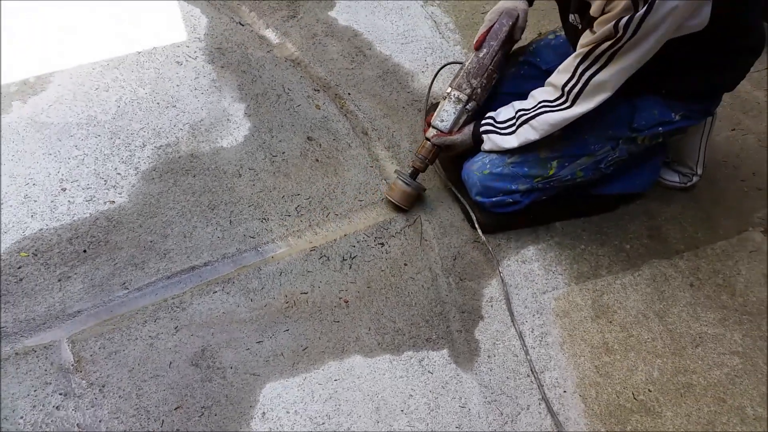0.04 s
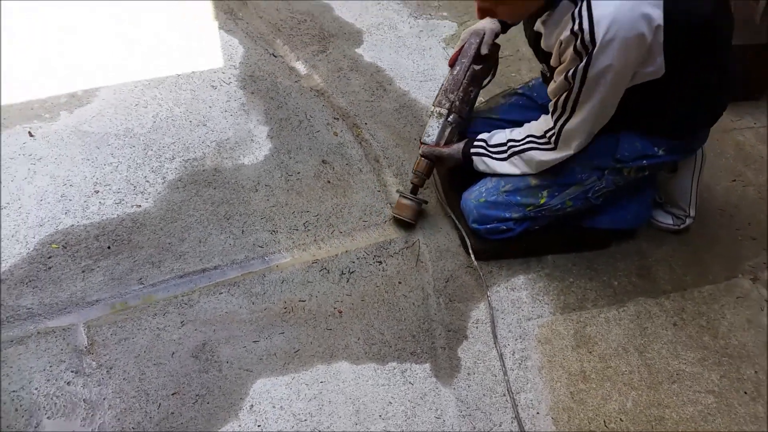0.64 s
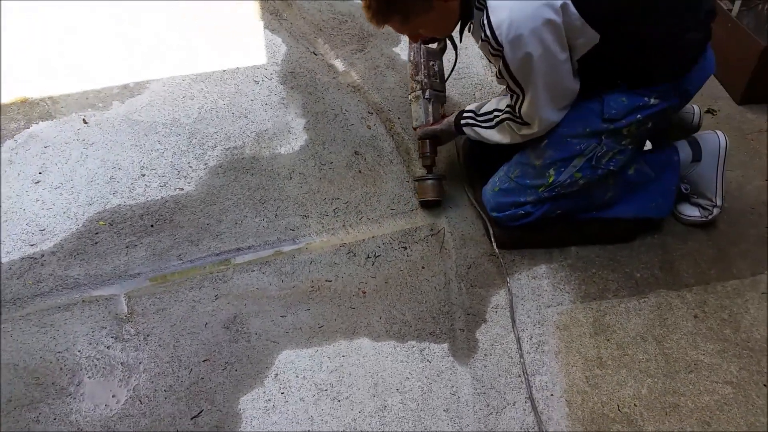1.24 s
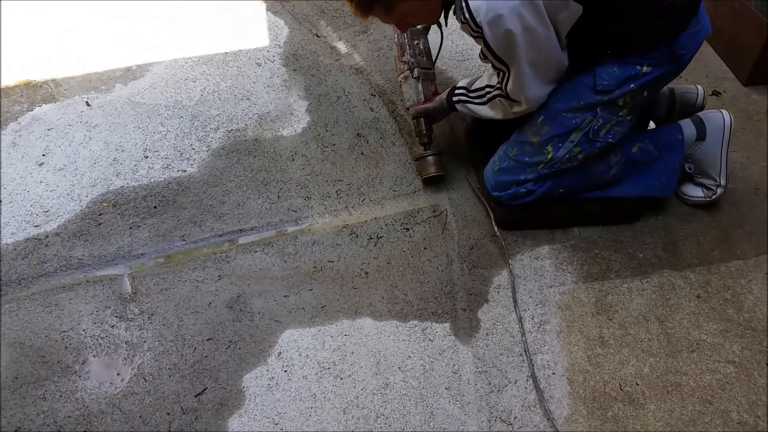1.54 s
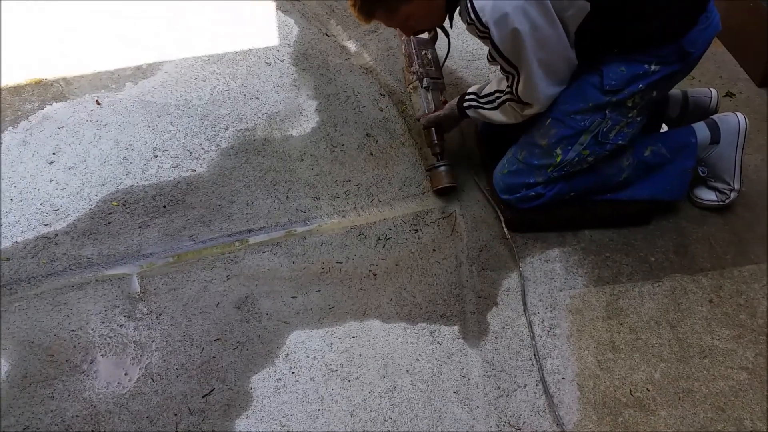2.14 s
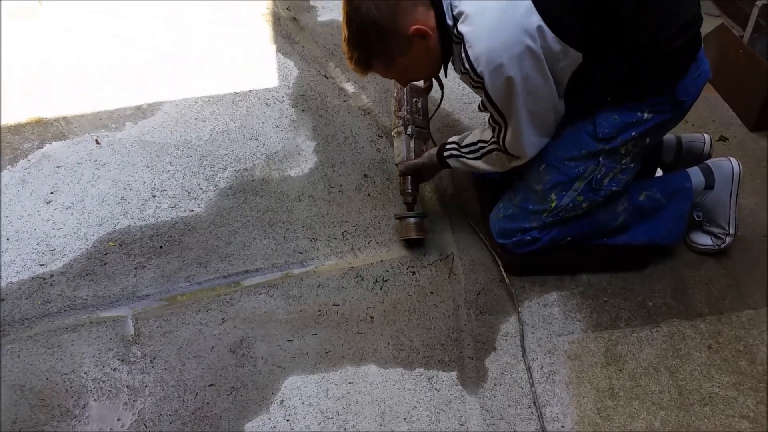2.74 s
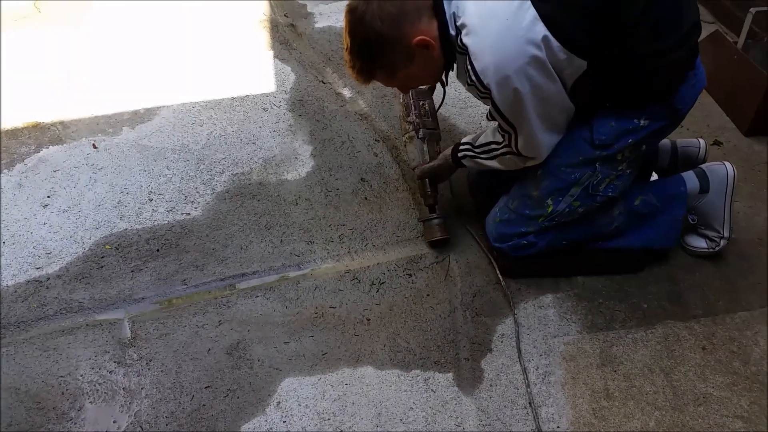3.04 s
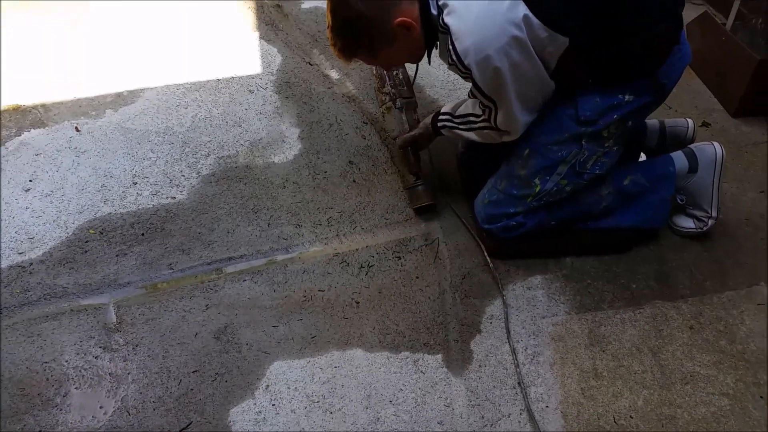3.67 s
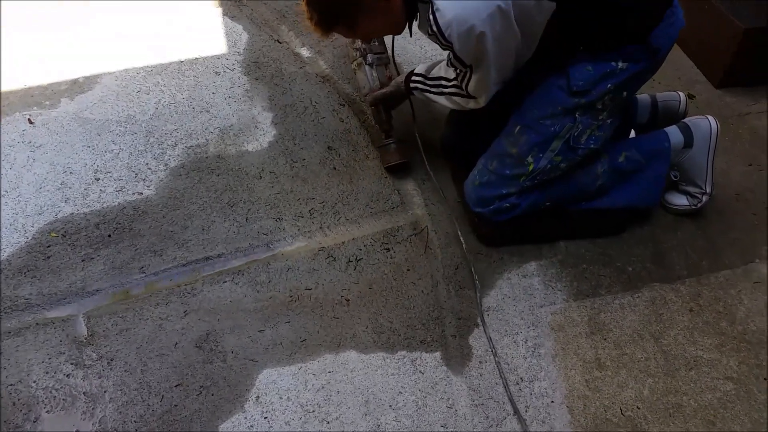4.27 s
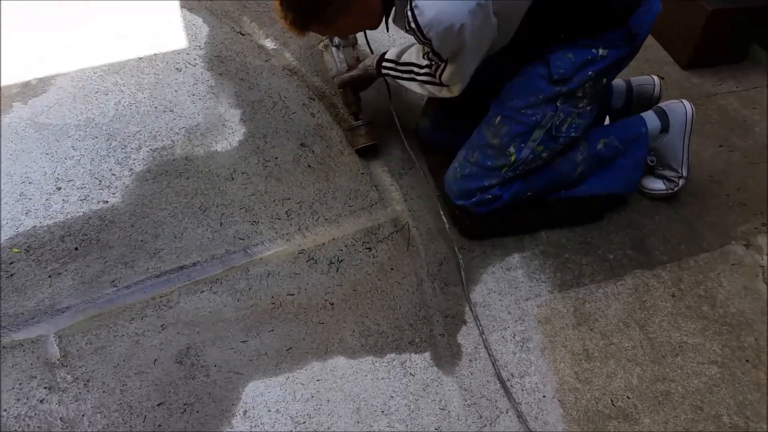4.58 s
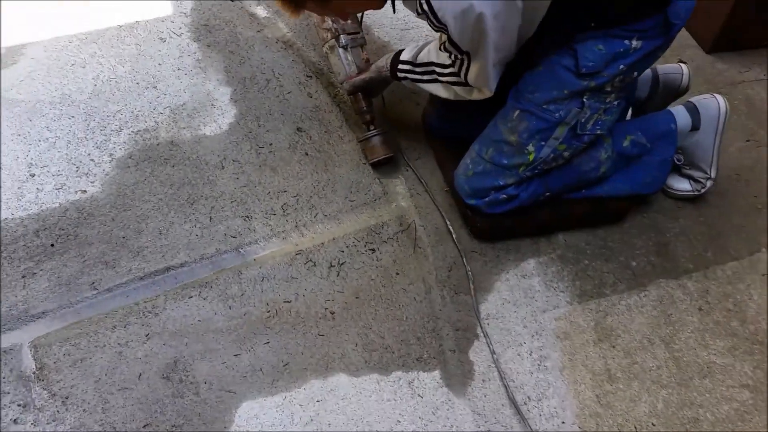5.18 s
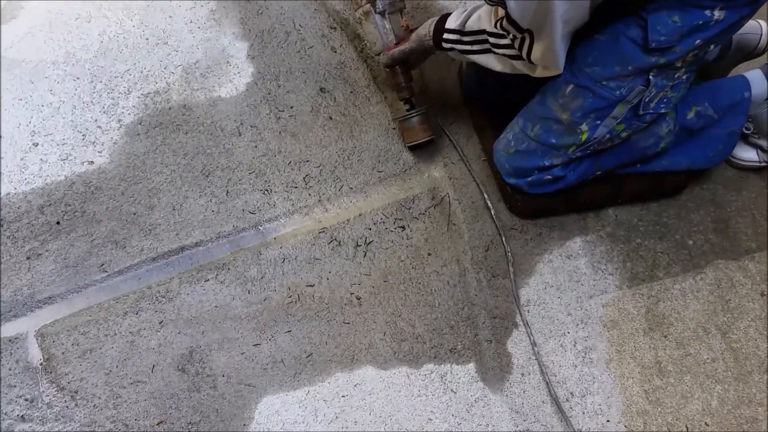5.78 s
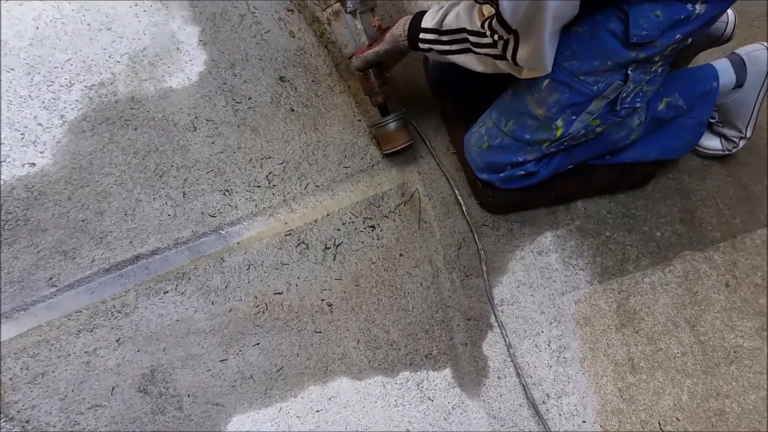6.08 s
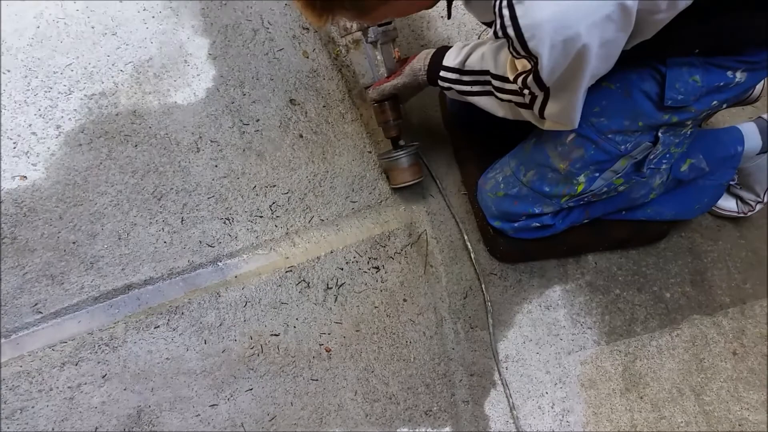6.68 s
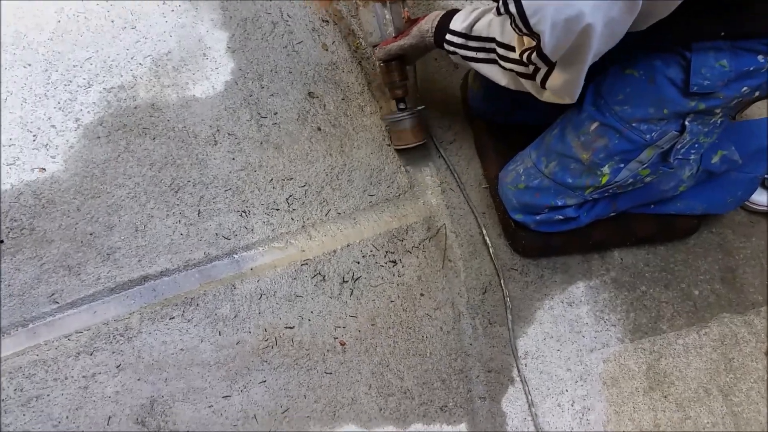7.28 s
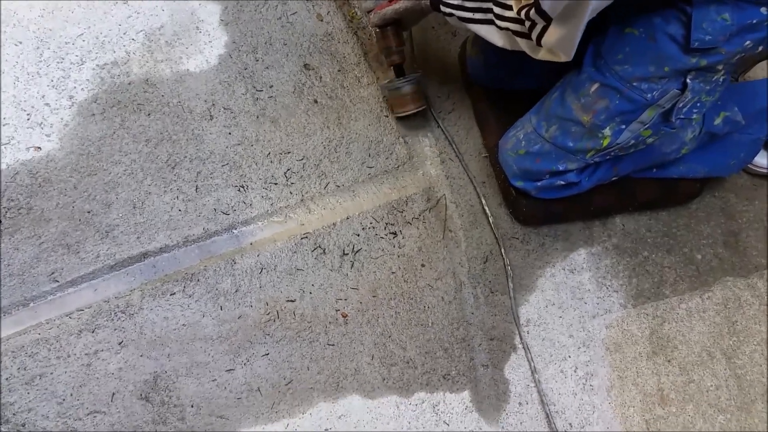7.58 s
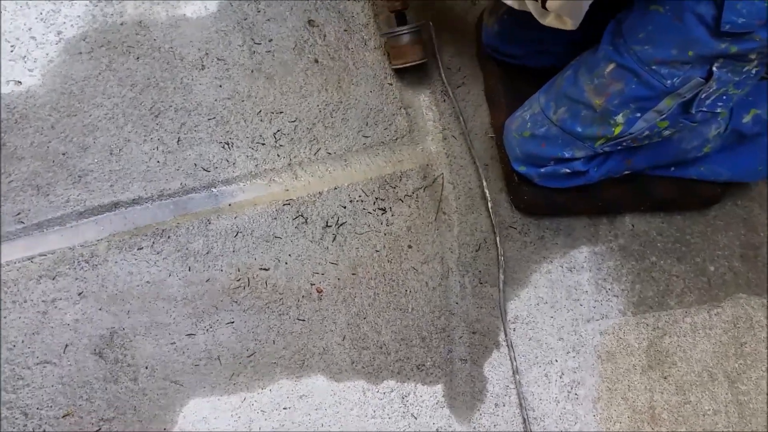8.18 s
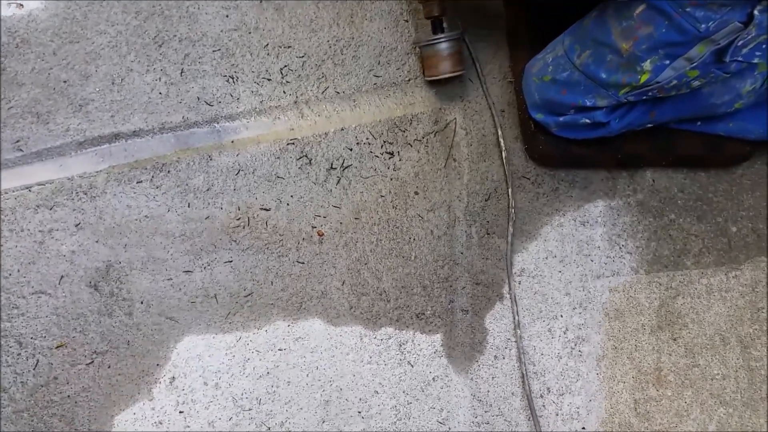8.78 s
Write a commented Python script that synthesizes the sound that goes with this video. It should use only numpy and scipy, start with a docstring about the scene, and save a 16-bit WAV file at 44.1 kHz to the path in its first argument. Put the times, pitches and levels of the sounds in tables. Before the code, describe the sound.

An electric drill spins a steel cup against a concrete floor, a metre or two from the microphone. The grinding runs without a break: a bright, steely hiss, a high ring and a gritty rasp, swelling slightly and chattering as the pressure shifts. Underneath, the motor hums and whines and its fan blows. A faint wind rumble and a few soft puffs bump the left side of the microphone.

```python
"""Grinding a concrete floor

A geared electric drill spins a steel cup about twelve times a second, a metre or two away. The cup
hisses, rings and chatters on the concrete while coarse grit rasps through the gear case. Underneath,
the motor hums and whines and its fan blows through the housing. Puffs of air bump the left microphone."""
import sys
import numpy as np
from scipy import signal
from scipy.fft import rfft, irfft
from scipy.io import wavfile
from scipy.ndimage import uniform_filter1d, map_coordinates

SR = 44100
rng = np.random.default_rng(int(sys.argv[2]) if len(sys.argv) > 2 else 0)


def inscribe(sig):
    """Save sig as 16-bit PCM at rate SR to the path in sys.argv[1].

    A 1-D sig is mono; a 2-D sig holds one channel per row.
    Samples are clipped to [-1, 1] before scaling.
    """
    pcm = np.round(np.clip(np.atleast_2d(sig).T, -1, 1) * 32767)
    wavfile.write(sys.argv[1], SR, pcm.astype(np.int16))


N = 397782

# how hard the hands press the cup down: t/s, level/dB
PRESSURE = [(0, -1), (.45, 0.3), (.8, -2), (1.1, 0), (2, 1), (2.8, -.6), (3.5, -0.1), (4.1, .8), (4.5, 0.1),
            (4.9, -1.2), (5.5, 0.5), (6.05, -1), (6.45, 0.5), (7.3, .3), (8.3, -1.4), (8.7, -0.8), (9, 0.5)]
ROCKS_PER_S = 8  # the hands rock the tool at random
def cup(contact_db, rock_db=.7):
    """The cup grinds the floor: hiss, ring and rasp all swell as the hands bear down."""
    pressure_db = curves(PRESSURE)[0] + rock_db * walk(ROCKS_PER_S)
    return (hiss(contact_db) * undb(-22.5 + .95 * pressure_db)
            + ring(contact_db) * undb(-.1 + .92 * pressure_db)
            + rasp(contact_db) * undb(-26 + .75 * pressure_db))


# the cup's high modes: f/Hz, width/Hz, level/dB
CUP_HIGH_MODES = [(8640, 440, -5), (9650, 950, -5.5), (10560, 330, 1), (11050, 900, -1.5), (12000, 850, 0),
                  (12620, 600, -2.5), (13800, 650, -3.5), (14500, 500, -7.5), (15020, 600, -3.5),
                  (15650, 600, -9)]
# the bright bed under them: f/Hz, level/dB
HISS_BED = [(3000, -55), (5500, -23), (6900, -15), (7700, -17), (13000, -18), (16000, -22.5)]
def hiss(contact_db):
    """Grit excites the cup's high modes into a steely hiss."""
    return scrape(contact_db, CUP_HIGH_MODES, HISS_BED, drift_db=1, flicker_db=1.7)


# the cup's main ring, a close pair on a broad skirt: f/Hz, width/Hz, level/dB
RING_MODES = [(5470, 270, -1.5), (5599, 210, 6), (5560, 1060, -10.5)]
# its envelope, damped as more of the rim lies on the floor: t/s, level/dB
RING_ENVELOPE = [(0, -24), (.5, -25.5), (1.2, -25), (1.7, -28.5), (2.8, -25), (3.3, -27), (4, -27.5),
                 (4.9, -30.5), (5.9, -27), (6.35, -31), (6.9, -26.5), (7.9, -26.5), (8.35, -32), (9, -34.5)]
def ring(contact_db, bounces_per_s=115, flutter_db=2.5, rock_db=1):
    """The rim bounces: it rings while free and is choked while it touches the floor."""
    free = np.tanh(2.5 * walk(bounces_per_s))
    force_db = .94 * contact_db + flutter_db * free + rock_db * walk(ROCKS_PER_S)
    force = grit(14000, spread_db=.9) * undb(force_db)
    return radiate(force, resonances(RING_MODES)) * undb(curves(RING_ENVELOPE)[0])


# gear case resonances: f/Hz, width/Hz, level/dB
GEAR_CASE_MODES = [(1600, 520, -1), (2020, 440, -3.5), (2450, 650, 0), (3015, 220, -1), (3450, 350, -1),
                   (4480, 920, -1)]
# the midrange bed under them: f/Hz, level/dB
RASP_BED = [(150, -38), (500, -18), (1000, -14), (2000, -14.5), (4000, -11.5), (6000, -11.5), (9000, -33)]
def rasp(contact_db):
    """Coarser grains shake the gear case into a rough rasp."""
    return scrape(.65 * contact_db, GEAR_CASE_MODES, RASP_BED, drift_db=.7, flicker_db=2)


def scrape(contact_db, modes, bed, drift_db, flicker_db, families=3):
    """Grit drives a set of modes; as the contact point wanders, each family of modes swells on its own."""
    out = 0
    for k in range(families):
        gain = resonances(modes[k::families], bed)
        force = grit(30000, spread_db=1) * undb(contact_db + drift_db * walk(2.996) + flicker_db * walk(90))
        out = out + radiate(force, gain) * np.sqrt(np.mean(gain ** 2))
    return out / out.mean(axis=0).std()


def grit(grains_per_s, spread_db):
    """Breaking sand grains: two dense streams of clicks of random size."""
    breaks = rng.random((2, N)) < grains_per_s / SR
    return breaks * rng.standard_normal((2, N)) * undb(spread_db * rng.standard_normal(N))


# dips in contact as the cup skips off the floor: t/s, level/dB
SKIPS = [(.788, -7), (1.634, -8), (1.721, -5), (1.811, -8), (2.419, -6), (2.682, -4), (2.876, -5),
         (5.199, -7), (5.504, -10), (6.007, -6), (6.058, -7), (7.259, -4), (7.374, -5), (8.103, -7),
         (8.142, -7), (8.29, -8)]
# spikes in contact as the rim catches a stone: t/s, level/dB
CATCHES = [(.955, 4), (1.42, 3.5), (1.693, 3), (2.688, 8.5), (2.881, 4.5), (3.616, 3), (4.438, 7),
           (5.932, 5), (6.878, 4), (8.152, 4), (8.913, 6)]
def contact(shaft_turns, gear_ratio=32.1, knocks_per_s=60, high_spots=6,
            release_s=.0061, settle_s=.13, skip_s=.0034, catch_s=.0064):
    """Contact force in dB: knocks that ebb, some by chance, some from high spots that return each turn."""
    t = np.arange(N) / SR
    knocks = (rng.random(N) < knocks_per_s / SR) * (1 + rng.random(N))
    spots = np.zeros(N)
    for k in range(high_spots):
        passes = np.floor(shaft_turns / gear_ratio + (k + rng.random()) / high_spots)
        spots += np.diff(passes, prepend=passes[0]) * np.maximum(1 + walk(1.55), 0)
    force = signal.lfilter([1], [1, -np.exp(-1 / (release_s * SR))], [knocks, spots])
    # the arms give way to any lasting push
    knocks, spots = force - uniform_filter1d(force, int(settle_s * SR))
    force_db = 6 * np.tanh((1.5 * unit(knocks) + .72 * unit(spots)) / 6)  # soft limit at 6 dB
    for s, db in SKIPS:
        near = slice(*np.searchsorted(t, [s - 10 * skip_s, s + 10 * skip_s]))
        force_db[near] += (db - force_db[near]) * np.exp(-.5 * ((t[near] - s) / skip_s) ** 2)
    for s, db in CATCHES:
        near = slice(*np.searchsorted(t, [s, s + 10 * catch_s]))
        force_db[near] += (db - force_db[near]) * np.exp(-((t[near] - s) / catch_s) ** 2)
    return force_db


# modes that speak for a while as the cup tilts: start/s, end/s, f/Hz, width/Hz, level/dB
CHATTER_CUES = [(0, .9, 1090, 170, -33.5), (0, 3.7, 2940, 110, -42), (.6, 2.7, 1620, 200, -38),
                (.9, 1.7, 10600, 220, -35), (.8, 3.5, 12150, 700, -31.5), (1.1, 3.7, 327, 80, -42),
                (1.1, 3.8, 600, 50, -45), (1.1, 3.6, 3420, 300, -39), (4.1, 4.8, 1540, 220, -37.5),
                (4.1, 5.8, 4420, 450, -37.5), (4, 8.4, 8660, 300, -36), (4.2, 5.2, 10350, 351, -37),
                (4.2, 6.4, 288, 35, -46.5), (4.5, 5.5, 2590, 280, -40), (5.6, 6.3, 2972, 249.7, -37),
                (6.05, 8.1, 1890, 150, -35.5), (6.1, 8.4, 2260, 280, -36), (6.1, 8.2, 1020, 200, -38),
                (5.2, 9.1, 550, 110, -44.5), (6.2, 8.2, 825, 80, -40), (8.35, 9, 1950, 330, -32.5),
                (8.4, 9.1, 11360, 700, -28)]
def chatter(contact_db, fade_s=.25, bites_per_s=800, trim_db=-.3):
    """The rim bites on stones, rubbing single modes of tool and cup into a ringing chatter."""
    t = np.arange(N) / SR
    force = np.zeros((2, N))
    for start, end, hz, width, db in CHATTER_CUES:
        near = slice(*np.searchsorted(t, [start - fade_s, end + fade_s]))
        swell = np.clip(np.minimum(t[near] - start, end - t[near]) / fade_s + .5, 0, 1)
        bites = rng.random(len(swell)) < bites_per_s / SR
        rub = bites * rng.standard_normal((2, len(swell))) * undb(.8 * contact_db[near])
        b, a = signal.iirpeak(hz, hz / width, fs=SR)
        ringing = signal.lfilter(b, a, signal.lfilter(b, a, rub))
        force[:, near] += unit(ringing) * swell * undb(db)
    return radiate(force, 1) * force.std() * undb(trim_db)


# the motor under changing load: t/s, shaft f/Hz, then level/dB of harmonics 1, 2 and 3
MOTOR_LOAD = [(0, 392.5, -37.5, -50, -40), (.35, 395.3, -37.5, -37, -40), (.7, 395, -37.5, -36, -40),
              (1.2, 398, -36, -35, -40), (1.8, 395.6, -37.5, -43, -36), (2.2, 393, -42, -42, -39),
              (2.7, 389, -45, -50, -48), (3.1, 389, -45, -38, -46), (3.6, 389.7, -42, -34, -42),
              (4.1, 387, -48.5, -44, -42), (4.5, 386.3, -56, -51, -39), (5.2, 380.7, -53, -36, -37),
              (5.9, 383, -42.5, -45, -43), (6.6, 385.6, -39, -36, -45), (7.2, 383, -38.5, -41, -43),
              (7.8, 382.6, -41, -40, -36), (8.4, 383, -40, -52, -48), (9, 381, -41, -53, -53)]
# whine of gear teeth and commutator: multiple of shaft speed, level/dB, phase wobble/rad
WHINE = [(4, -68, 0.83), (6, -46, 1.15), (15, -37, 0.46), (30, -42, .35)]
def motor(shaft_turns, hum_db, overtones_db, lag_rad=.59):
    """A clean hum at shaft speed; the harmonics above wobble with gear play and waver in level."""
    angle = 2 * np.pi * shaft_turns
    out = undb(hum_db + 1.3 * walk(14)) * np.sin(angle + np.array([[lag_rad], [0]]))
    for order, db in enumerate(overtones_db, 2):
        out += undb(db - 1 + 2 * walk(30)) * np.sin(order * angle + .52 * walk(30))
    for order, db, wobble_rad in WHINE:
        order = round(order)
        left_gain = undb(np.interp(order * MOTOR_LOAD[0][1], *np.transpose(BALANCE)))
        phase = order * angle + wobble_rad * walk(45) + lag_rad * np.array([walk(2.62), walk(3)])
        out += np.array([[left_gain], [1]]) * undb(db + 3 * walk(4)) * np.sin(phase)
    return np.sqrt(2) * out


# hollows of the motor housing: f/Hz, width/Hz, level/dB
HOUSING_MODES = [(281, 86, -10), (371, 100, -9.5), (597, 170, -5.5), (799, 106, 1.5), (1100, 200, -2.5),
                 (1154, 86, 3.5), (1284, 400, -4)]
# the airy bed under them: f/Hz, level/dB
AIR_BED = [(20, -36), (60, -15.5), (110, -17), (200, -10), (480, -12.5), (900, -6.5), (1800, -17),
           (4000, -28), (9000, -50)]
def fan(air_db=-28.5, tilt_db=2.5, upright_s=1.2, fade_db_per_s=.21, flutter_db=1.66, surge_db=.7):
    """Cooling air sounds the housing: loudest while the tool leans, fading as the vents turn away."""
    t = np.arange(N) / SR
    level_db = air_db + tilt_db * np.clip(1 - t / upright_s, 0, 1) - fade_db_per_s * t
    flow = rng.standard_normal((2, N)) * undb(flutter_db * walk(35) + surge_db * walk(4))
    return radiate(flow, resonances(HOUSING_MODES, AIR_BED)) * undb(level_db)


# tone of the wind rumble: f/Hz, level/dB
RUMBLE_EQ = [(15, -19), (50, -2.5), (100, 0.5), (200, -11), (400, -15), (1500, -55)]
# its envelope: t/s, level/dB
RUMBLE_ENVELOPE = [(0, -43), (.6, -40), (1.25, -46), (2.2, -46), (3.2, -51), (4, -43), (5.2, -39), (6, -40),
                   (6.6, -48), (7.4, -44.5), (8.4, -47), (9, -41)]
# puffs of air: t/s, peak level/dB
PUFFS = [(0.55, -20), (0.608, -23), (0.753, -18), (0.915, -23), (2.438, -15), (3.683, -8), (4.71, -25),
         (5.075, -21), (5.127, -21), (5.433, -20.5), (5.983, -22), (8.978, -24)]
def draught(gust_db=5.5, puff_s=.00098):
    """Moving air rumbles on the left microphone; each puff is one quick swing of pressure."""
    t = np.arange(N) / SR
    rumble = irfft(rfft(rng.standard_normal(N)) * undb(over_hz(RUMBLE_EQ)), N)
    left = unit(rumble * undb(gust_db * walk(14))) * undb(curves(RUMBLE_ENVELOPE)[0])
    for s, db in PUFFS:
        near = slice(*np.searchsorted(t, [s - 10 * puff_s, s + 10 * puff_s]))
        swing = (t[near] - s) / puff_s + 1
        left[near] += undb(db) * swing * np.exp((1 - swing ** 2) / 2)
    return np.array([left, np.zeros(N)])


def echoes(x, echo_db=-12, sway_s=.0001, band_hz=(700, 4500)):
    """Adds three dull reflections off the walls and the worker; they shift as the microphones sway."""
    dull = signal.sosfilt(signal.butter(1, band_hz, "bandpass", fs=SR, output="sos"), x)
    delays_s = [rng.uniform(.003, .022) + sway_s * walk(1.2) for _ in range(3)]
    i = np.arange(N)
    return x + undb(echo_db) * sum(np.interp(i - delay * SR, i, dull) for delay in delays_s)


# stereo balance: f/Hz, left minus right level/dB
BALANCE = [(250, -1), (800, -0.5), (1150, -3), (2200, -1), (3000, -0.5), (3500, -6), (4400, -10.5),
           (5000, -21), (5600, -17), (6200, -9), (7800, -3), (9500, 1.5), (11000, -2), (15000, 0)]
# stereo image, narrow in the bass and wide on top: f/Hz, left-right correlation
CORRELATION = [(60, .6), (300, 0.79), (700, 0.65), (1400, .48), (2800, 0.42), (5000, 0.15), (15000, 0.04)]
def radiate(force, gain):
    """Two forces sound a body in stereo, mid rms 1; floor and walls leave mainly the bass alike."""
    a, b = rfft(force)
    alike = np.clip(over_hz(CORRELATION), -1, 1)
    mid, side = a * np.sqrt(1 + alike), b * np.sqrt(1 - alike)
    out = irfft(gain * np.array([(mid + side) * undb(over_hz(BALANCE)), mid - side]), N)
    return out / np.sqrt(np.mean(out.mean(axis=0) ** 2))


def resonances(modes, bed=None):
    """EQ gain of steep resonant peaks over an optional smooth bed."""
    f = np.fft.rfftfreq(N, 1 / SR)
    power = sum(undb(db) ** 2 / (1 + (2 * (f - hz) / width) ** 2) ** 2 for hz, width, db in modes)
    return np.sqrt(power + (0 if bed is None else undb(over_hz(bed)) ** 2))


def walk(rate):
    """Random modulator gliding to a new value rate times a second; rms 1."""
    hold = max(int(SR / rate), 2)
    steps = np.repeat(rng.standard_normal(N // hold + 1), hold)[:N]
    return unit(uniform_filter1d(steps, hold))


def curves(table):
    """The columns of a timed table as envelopes, one value a sample."""
    s, *columns = np.transpose(table)
    return [np.interp(np.arange(N) / SR, s, c) for c in columns]


def over_hz(points):
    """An (f/Hz, value) table spread over the frequency bins."""
    hz, value = np.transpose(points)
    return np.interp(np.log(np.fft.rfftfreq(N, 1 / SR) + 1), np.log(hz), value)


def undb(db):
    """Decibels to gain."""
    return 10 ** (np.asarray(db) / 20)


def unit(x):
    """Scale to rms 1."""
    return x / np.sqrt(np.mean(x ** 2))


# the tool's bearing from the microphones: t/s, delay of left behind right/s
LEFT_DELAY = [(0, 45e-6), (3.9, 45e-6), (4.7, -15e-6), (5.8, 0), (8.3, 0), (9, 30e-6)]
def scene():
    """One shaft times motor and cup; the tool reaches the two microphones a moment apart."""
    shaft_hz, hum_db, *overtones_db = curves(MOTOR_LOAD)
    shaft_turns = np.cumsum(shaft_hz) / SR
    contact_db = contact(shaft_turns)
    grinding = np.array([echoes(side) for side in cup(contact_db) + chatter(contact_db)])
    left, right = motor(shaft_turns, hum_db, overtones_db) + fan() + grinding
    lag_s, = curves(LEFT_DELAY)
    left = map_coordinates(left, [np.arange(N) - lag_s * SR], order=5, mode="mirror")
    return np.array([left, right]) + draught()


def record(dry):
    """A steep high cut at 15720 Hz."""
    return signal.sosfilt(signal.ellip(12, .1, 80, 15720, fs=SR, output="sos"), dry)


dry = scene()
out = record(dry)
inscribe(out)
```